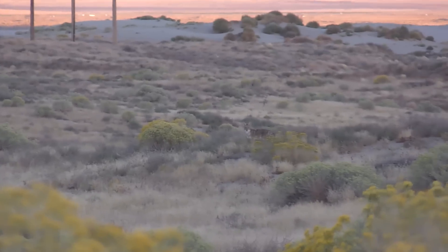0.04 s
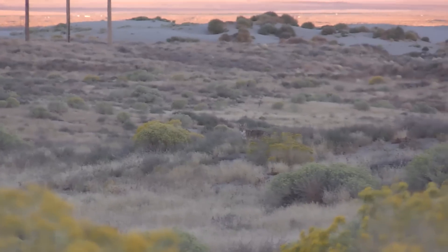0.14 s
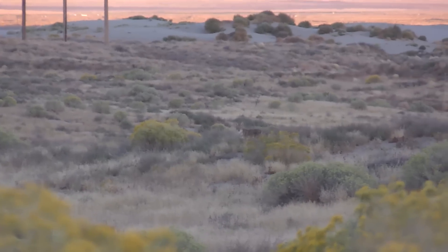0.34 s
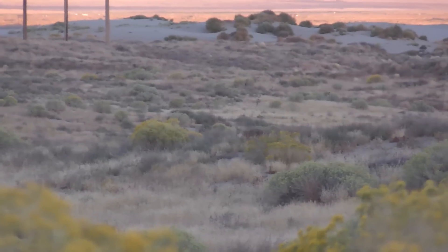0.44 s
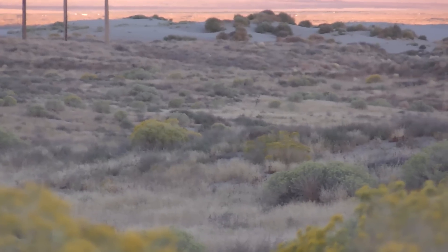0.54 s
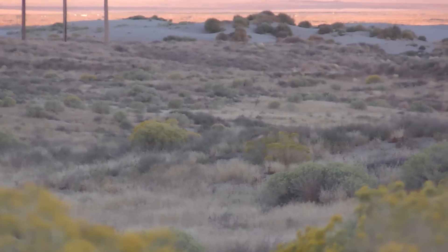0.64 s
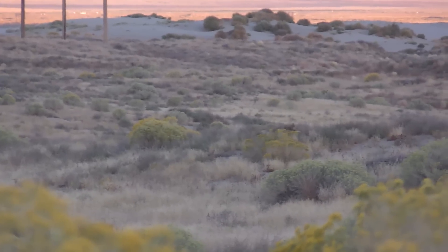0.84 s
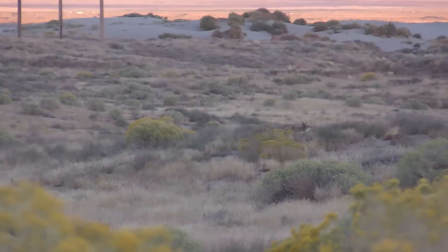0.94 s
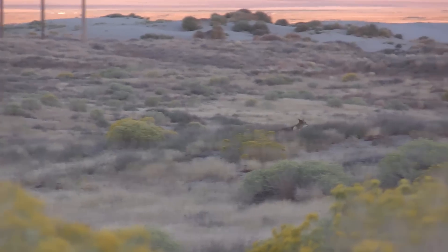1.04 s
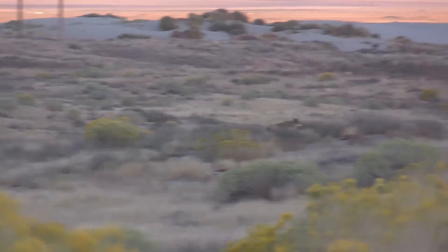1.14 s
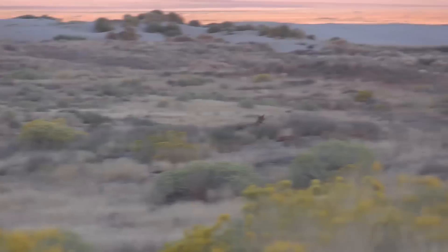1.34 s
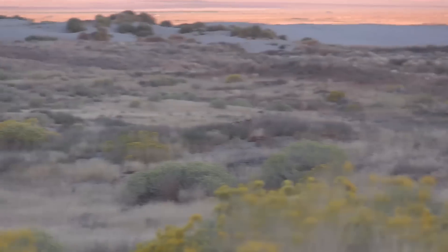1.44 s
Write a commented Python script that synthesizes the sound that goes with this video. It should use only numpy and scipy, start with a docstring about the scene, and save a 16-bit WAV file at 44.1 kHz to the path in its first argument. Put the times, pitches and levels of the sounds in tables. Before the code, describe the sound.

A single close rifle shot cracks over open scrubland, its short echo rolling away into quiet

```python
"""A light wind hiss is heard first; then one rifle shot cracks over open scrubland, close and overloaded.
The shot is a burst of noise over decaying sine tones, the lower tones swelling later.
Brush scatters the crack back as fluttering hiss, the ground rolls the bass away as noise that fades
octave by octave, and far slopes answer with faint bursts of band noise.
Handling ticks follow; at the end clothing rustles and scuffs as the camera is swung round."""
import sys
import numpy as np
from scipy import signal
from scipy.fft import rfft, irfft, next_fast_len
from scipy.io import wavfile
from scipy.ndimage import uniform_filter1d, map_coordinates

SR = 44100
rng = np.random.default_rng(int(sys.argv[2]) if len(sys.argv) > 2 else 0)


def transcribe(signal):
    """Save signal, clipped to [-1, 1], as a 16-bit WAV file at the path in sys.argv[1]."""
    frames = np.atleast_2d(signal).T
    limited = np.clip(frames, -1, 1)
    pcm = np.round(limited * 32767).astype(np.int16)
    wavfile.write(sys.argv[1], SR, pcm)


N = 66150  # samples, 1.5 s


def amp(db):
    """Decibels to linear gain."""
    return 10 ** (np.asarray(db) / 20)


def unit(x):
    """Scale to rms 1."""
    return x / np.sqrt(np.mean(x ** 2) + 1e-20)


def clock():
    """The time of each sample in seconds."""
    return np.arange(N) / SR


def along(points, hz):
    """Read a curve of (f/Hz, value) points on a log frequency axis."""
    f, value = np.transpose(points)
    return np.interp(np.log(hz + 1), np.log(f + 1), value)


def level(points):
    """Gain that follows (t/s, level/dB) points, straight in decibels."""
    return amp(np.interp(clock(), *np.transpose(points)))


def filtered(x, response):
    """Shape the spectrum of x by a gain that is a function of frequency."""
    size = next_fast_len(N + SR // 4)  # zero padding limits wrap-around
    gain = response(np.fft.rfftfreq(size, 1 / SR))
    return irfft(rfft(x, size) * gain, size)[:N]


def noise(spectrum):
    """Noise of rms 1, coloured by (f/Hz, level/dB per Hz) points."""
    return unit(filtered(rng.standard_normal(N), lambda hz: amp(along(spectrum, hz))))


def band(centre_hz, octaves):
    """Noise of rms 1 in one band, bell-shaped over log frequency."""
    def bell(hz):
        distance = np.log2((hz + 1) / centre_hz) / octaves
        return np.exp(-.5 * distance ** 2)
    return unit(filtered(rng.standard_normal(N), bell))


def flutter(rate, depth_db):
    """A smooth random gain with rate knots per second, spread by depth_db."""
    knots = rng.standard_normal(N)
    return amp(depth_db * map_coordinates(knots, [clock() * rate], order=3))


def envelope(start, rise, hold, t60):
    """Linear rise, hold, then exponential decay by 60 dB in t60 seconds."""
    age = clock() - start
    decay_age = np.maximum(age - rise - hold, 0)
    return np.clip(age / rise, 0, 1) * amp(-60 * decay_age / t60)


def fading(x, start, rise, hold, t60s):
    """One attack for all octaves, while each octave dies at its own speed."""
    out = np.zeros(N)
    for centre in 20 * 2. ** np.arange(11):
        # triangular bands overlap, each reaching zero an octave from its centre
        octave = filtered(x, lambda hz: np.maximum(1 - abs(np.log2((hz + 1) / centre)), 0))
        out += octave * envelope(start, rise, hold, along(t60s, centre))
    return out


def burst(start, db, centre_hz, octaves, rise, t60):
    """A short swell of noise in one band that decays straight after its rise."""
    return amp(db) * band(centre_hz, octaves) * envelope(start, rise, 0, t60)


# Colour of the wind and hiss: f/Hz, relative level/dB per Hz
AIR_SPECTRUM = [(25, -2.5), (100, 0.5), (220, -2), (310, -11.5), (410, -5), (600, -13.5), (900, -15.5),
                (1500, -21.5), (5000, -27.5), (15500, -33)]
AIR_DB = -58  # rms


def air():
    """Light wind and hiss: steady noise, strongest in the bass."""
    return amp(AIR_DB) * noise(AIR_SPECTRUM)


# Small handling ticks: t/s, level/dB before the trim TICK_DB
TICKS = [(0.5575, -40), (.62, -48), (0.851, -52), (.878, -51), (0.978, -50.5), (1.025, -56), (1.1998, -52),
         (1.3289, -55), (1.3604, -43)]
TICK_DB, TICK_HZ, TICK_T60_S = -9.5, 3460, 0.023
# Colour of rubbing cloth: f/Hz, relative level/dB per Hz
CLOTH_SPECTRUM = [(25, -14.5), (70, -0.5), (140, -2), (330, -2.5), (800, -8), (1300, -9), (2700, -10.5),
                  (6000, -17.5), (10000, -22), (15500, -30.5)]
# Swell of the rustle: t/s, level/dB
RUSTLE_LEVEL = [(.9, -70.5), (1.05, -64.5), (1.27, -63), (1.35, -53.5), (1.41, -45), (1.5, -42)]
# Rise and fall of the narrow rubbing tone: t/s, level/dB
SCUFF_LEVEL = [(1.22, -74), (1.29, -63.5), (1.31, -55.5), (1.36, -59), (1.41, -56), (1.47, -70)]
SCUFF_HZ, SCUFF_OCTAVES = 1300, 0.21


def handling():
    """Ticks of band noise, a narrow scuff, and a grainy rustle of clothing that swells."""
    ticks = np.zeros(N)
    for start, db in TICKS:
        ticks += burst(start, db + TICK_DB, TICK_HZ, octaves=0.79, rise=.001, t60=TICK_T60_S)
    rustle = level(RUSTLE_LEVEL) * noise(CLOTH_SPECTRUM) * flutter(rate=250, depth_db=1.83)
    scuff = level(SCUFF_LEVEL) * band(SCUFF_HZ, SCUFF_OCTAVES) * flutter(rate=68, depth_db=2.0)
    return ticks + rustle + scuff


# Colour of the bass roll over the ground: f/Hz, relative level/dB per Hz
ROLL_SPECTRUM = [(25, -40), (70, -23), (110, -12), (170, -0.5), (250, -1.5), (380, 2), (520, -8.5),
                 (750, -12), (1200, -51), (4000, -77)]
# Decay of the roll, mostly slower in the bass: f/Hz, t60/s
ROLL_T60 = [(60, 0.76), (150, 0.87), (250, 0.6), (400, 0.41), (800, 0.33)]
ROLL_DB, ROLL_START_S, ROLL_RISE_S, ROLL_HOLD_S = -20.5, 0.2698, 0.021, 0.033
# Colour of the long faint tail of the land: f/Hz, relative level/dB per Hz
LAND_SPECTRUM = [(30, -10), (60, -3.5), (130, 4.5), (300, -8), (600, -16.5), (2000, -18), (5000, -27),
                 (9000, -40), (16000, -73)]
LAND_DB, LAND_RISE_S, LAND_T60_S = -42, .15, 2.4
# Single echoes: t/s, level/dB, centre f/Hz, width/octaves, rise/s, t60/s
ECHOES = [(0.279, -22, 6000, 0.38, 0.0024, 0.034), (.392, -38, 2070, 0.44, 0.013, .15),
          (0.439, -40, 1960, 0.42, 0.026, 0.17), (.43, -52, 6000, .7, .04, 0.18),
          (.5, -41.5, 164, 0.12, 0.026, 0.34), (.735, -45, 100, 0.99, 0.015, 0.16),
          (.8, -41, 55, 0.67, 0.015, 0.091), (.828, -52.5, 1460, 1.15, .02, 0.19),
          (0.864, -50.5, 1570, 0.46, 0.029, 0.2)]


def terrain():
    """The boom rolls away ever deeper into a long tail, with single echoes from the slopes."""
    roll = amp(ROLL_DB) * fading(noise(ROLL_SPECTRUM), ROLL_START_S, ROLL_RISE_S, ROLL_HOLD_S, ROLL_T60)
    tail = amp(LAND_DB) * noise(LAND_SPECTRUM) * flutter(rate=40, depth_db=1.53)
    tail *= envelope(ROLL_START_S, LAND_RISE_S, 0, LAND_T60_S)
    echoes = sum(burst(*echo) for echo in ECHOES)
    return roll + tail + echoes


# Colour of the scatter before its low cut: f/Hz, relative level/dB per Hz
BRUSH_SPECTRUM = [(400, -9), (700, -0.5), (1100, -5), (2300, -5), (4700, -2.5), (7000, -5), (10000, -10.5),
                  (15500, -19)]
# Decay of the scatter, faster in the treble: f/Hz, t60/s
BRUSH_T60 = [(500, 0.35), (2000, 0.34), (5000, .29), (9000, .26), (15000, .22)]
BRUSH_DB, BRUSH_START_S, BRUSH_RISE_S, BRUSH_HOLD_S = -19, .25, 0.034, 0.029
BRUSH_LOW_HZ = 449  # the low cut is 6 dB down here


def brush():
    """Countless bushes throw the crack back as an uneven hiss that loses its treble first."""
    hiss = filtered(noise(BRUSH_SPECTRUM), lambda hz: hz ** 2 / (hz ** 2 + BRUSH_LOW_HZ ** 2))
    hiss = unit(hiss) * flutter(rate=220, depth_db=2.0)
    return amp(BRUSH_DB) * fading(hiss, BRUSH_START_S, BRUSH_RISE_S, BRUSH_HOLD_S, BRUSH_T60)


SHOT_S = .2378
# Tones of the muzzle boom: f/Hz, peak level/dB
BOOM_TONES = [(68, -26), (138, -14), (345, -8), (440, -10.5), (680, -14), (937, -13.5), (1330, -12.5),
              (1800, -16), (2600, -15)]
# a tone at BOOM_REF_HZ swells to its peak in BOOM_PEAK_S; lower tones lag by a power law
BOOM_PEAK_S, BOOM_REF_HZ, BOOM_LAG, BOOM_SHARPNESS = 0.0077, 330, 0.53, 4.1
# Colour of the crack: f/Hz, relative level/dB per Hz
CRACK_SPECTRUM = [(40, -13), (150, -0.5), (900, 2.5), (1500, -4.5), (3000, -2), (5000, -7.5), (9500, -8),
                  (16000, -21)]
CRACK_DB, CRACK_RISE_S, CRACK_HOLD_S, CRACK_T60_S = -12.5, 0.0021, 0.0079, 0.13


def muzzle():
    """A sharp noise crack over a boom of a few cycles that drops in pitch as low tones peak later."""
    age = np.maximum(clock() - SHOT_S, 0)
    boom = np.zeros(N)
    for hz, db in BOOM_TONES:
        peak_s = BOOM_PEAK_S * (BOOM_REF_HZ / hz) ** BOOM_LAG
        progress = age / peak_s
        swell = (progress * np.exp(1 - progress)) ** BOOM_SHARPNESS  # reaches 1 at peak_s
        boom += amp(db) * swell * np.sin(2 * np.pi * hz * age)
    crack = amp(CRACK_DB) * noise(CRACK_SPECTRUM)
    crack *= envelope(SHOT_S, CRACK_RISE_S, CRACK_HOLD_S, CRACK_T60_S)
    return boom + crack


def scene():
    """The quiet sounds near the camera, the land's answer and the shot, as one channel."""
    return (air() + handling() + terrain() + brush() + muzzle())[None]


DUCK_ABOVE_DB, DUCK_SHARE = -25.5, 0.29  # threshold; dB of ducking per dB above it
DUCK_RECOVER_DB_PER_S, DUCK_ATTACK_S = 7.5, 0.038
CLIP_LEVEL, CLIP_HARDNESS = .6, 4.7  # ceiling in linear amplitude; exponent of the knee
TOP_HZ = 15800


def record(dry):
    """Gain control ducks after the blast and recovers slowly; peaks clip; the top band is cut."""
    x = dry[0]
    level_db = 10 * np.log10(abs(uniform_filter1d(x ** 2, size=128)) + 1e-12)
    wanted_db = DUCK_SHARE * np.maximum(level_db - DUCK_ABOVE_DB, 0)
    # hold the deepest duck so far, released at a constant rate
    recovered_db = DUCK_RECOVER_DB_PER_S * clock()
    duck_db = np.maximum.accumulate(wanted_db + recovered_db) - recovered_db
    # one-pole smoothing makes the duck arrive gradually
    step = 1 / (DUCK_ATTACK_S * SR)
    ducked = x * amp(-signal.lfilter([step], [1, step - 1], duck_db))
    overload = abs(ducked / CLIP_LEVEL) ** CLIP_HARDNESS
    clipped = ducked / (1 + overload) ** (1 / CLIP_HARDNESS)
    return filtered(clipped, lambda hz: hz < TOP_HZ)[None]


dry = scene()
out = record(dry)
transcribe(out)
```